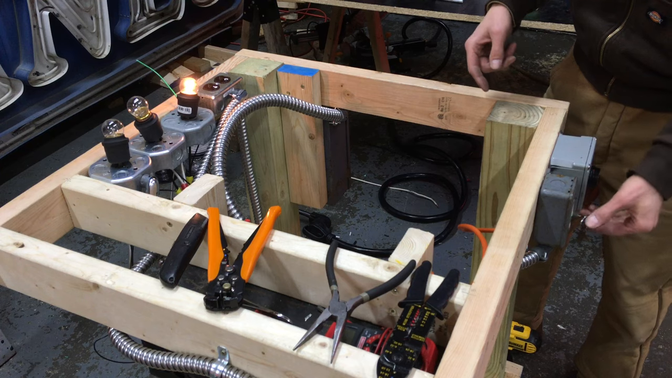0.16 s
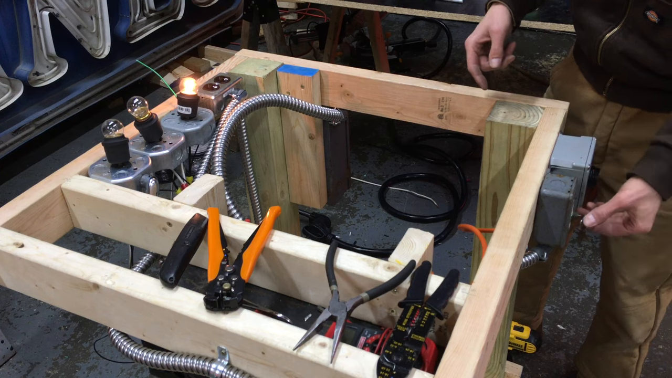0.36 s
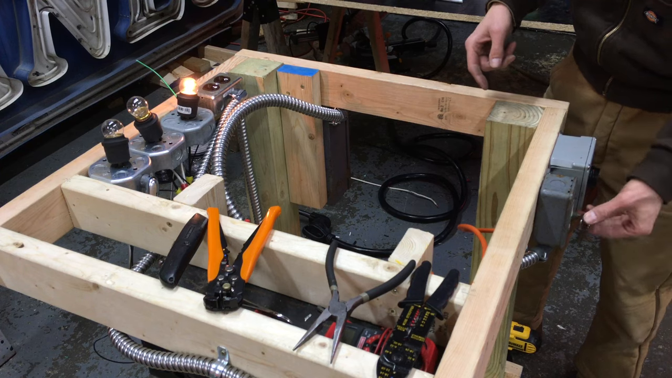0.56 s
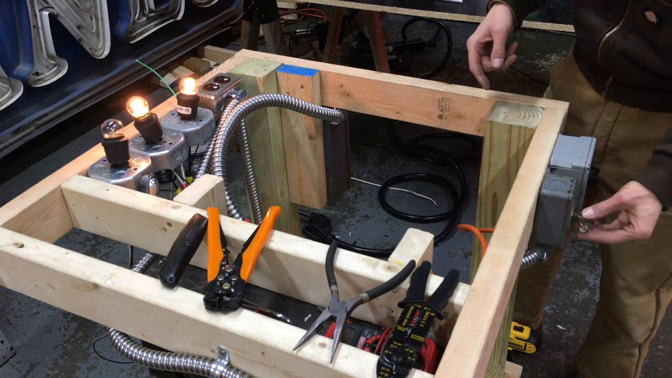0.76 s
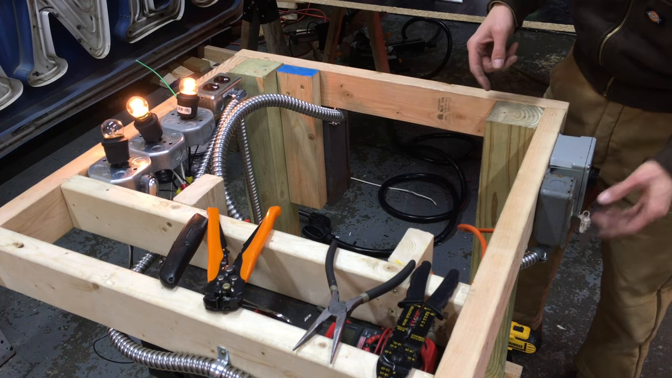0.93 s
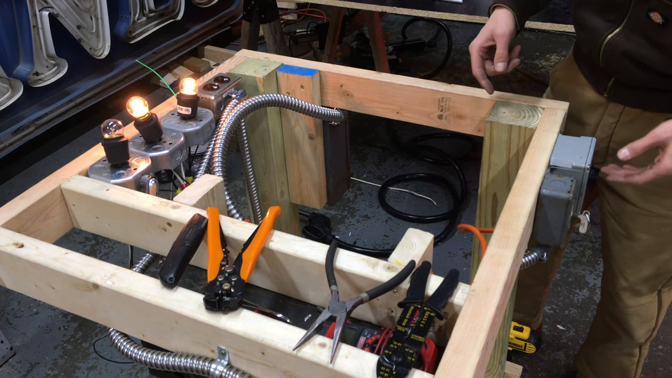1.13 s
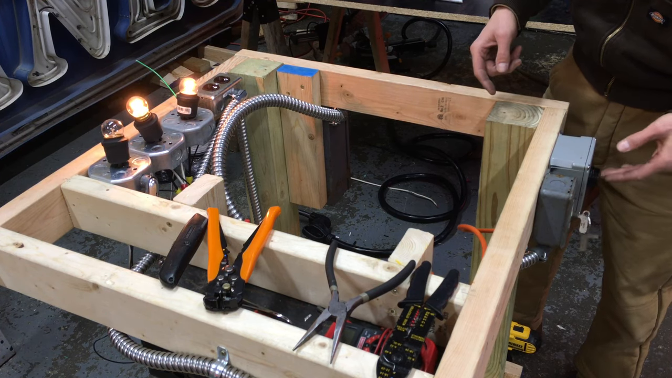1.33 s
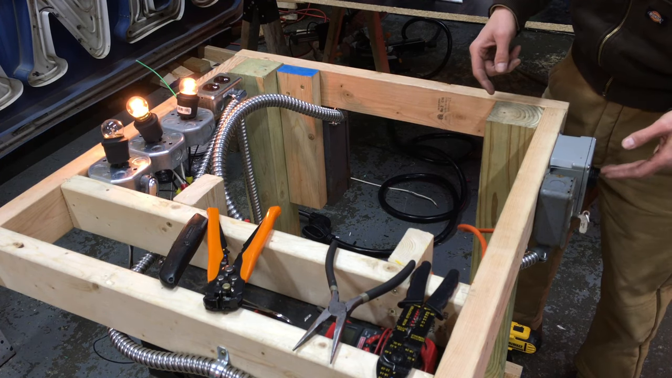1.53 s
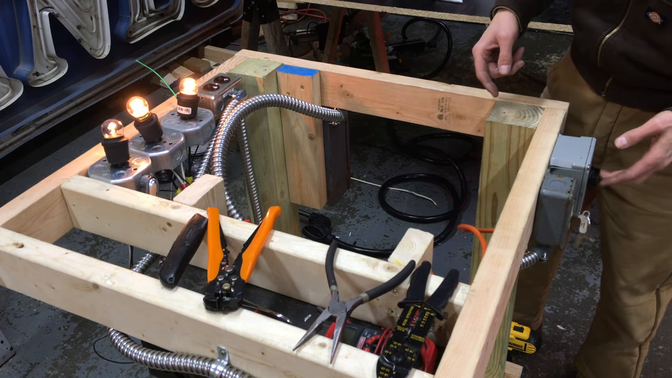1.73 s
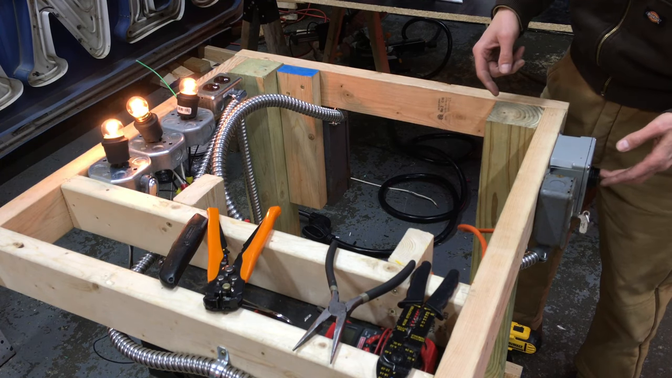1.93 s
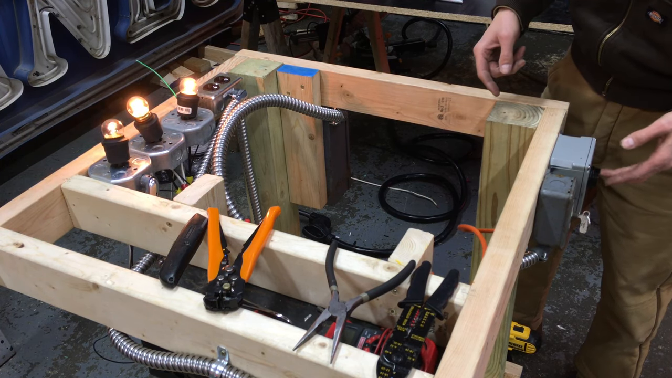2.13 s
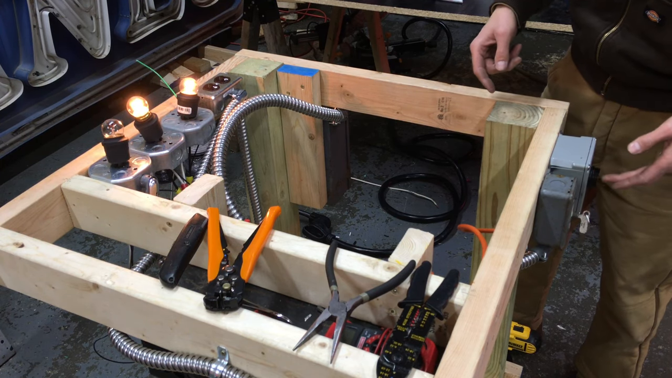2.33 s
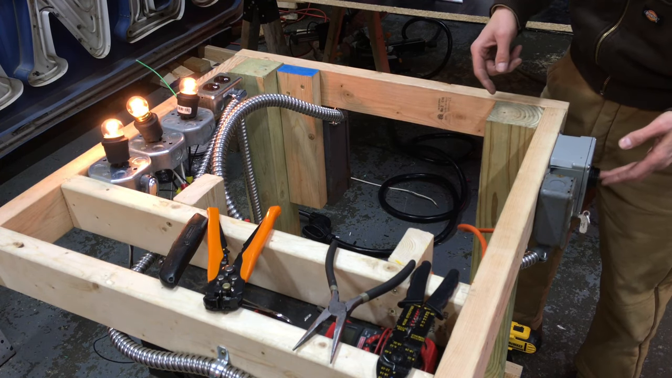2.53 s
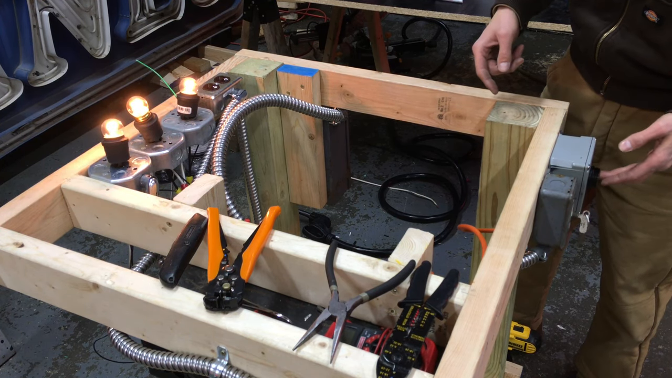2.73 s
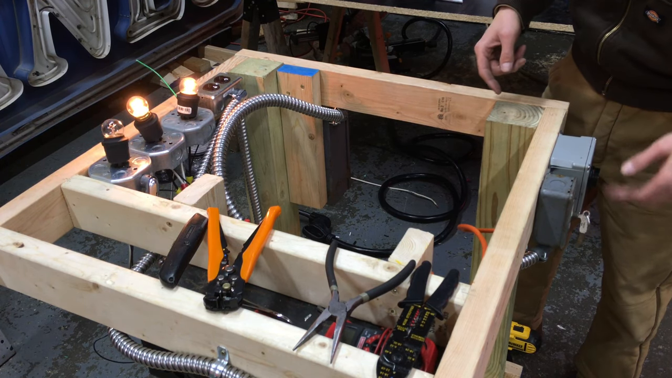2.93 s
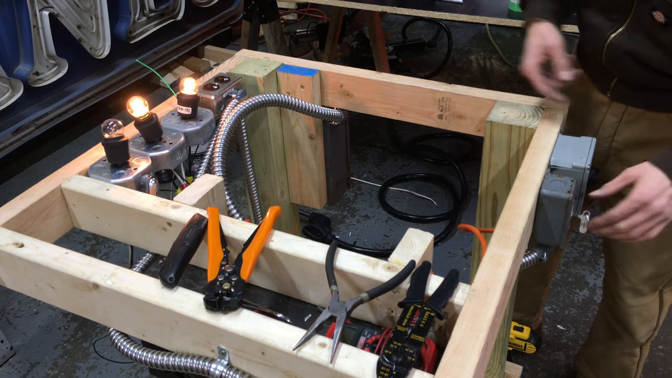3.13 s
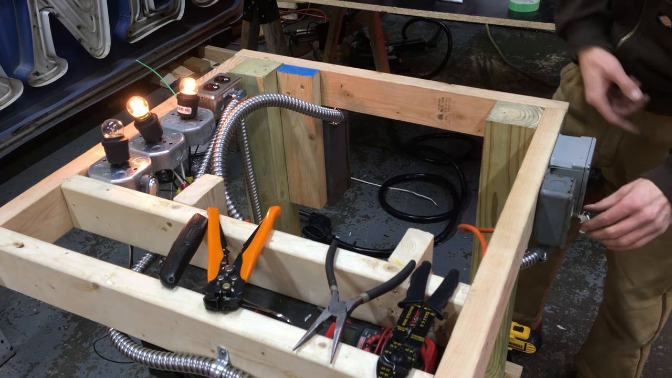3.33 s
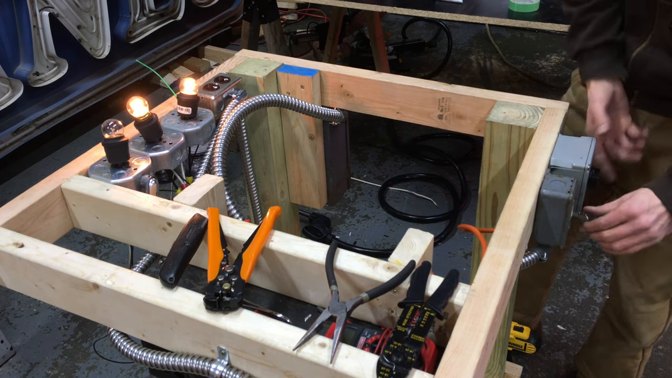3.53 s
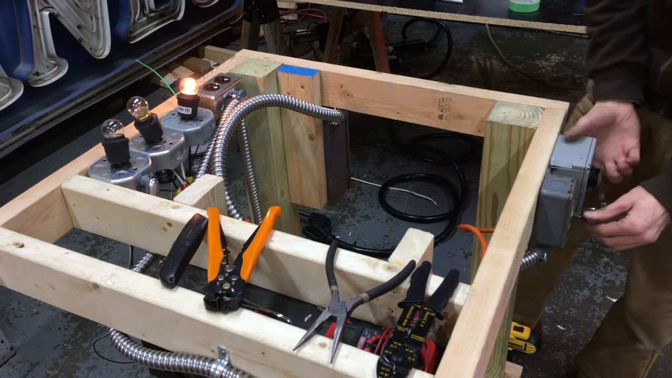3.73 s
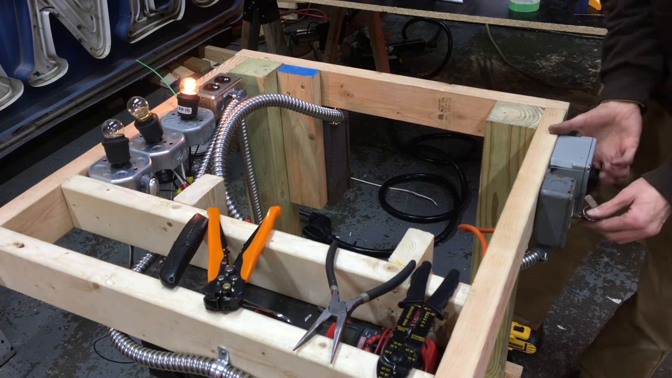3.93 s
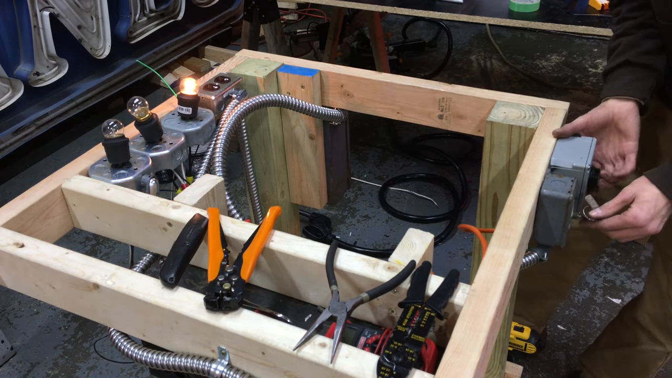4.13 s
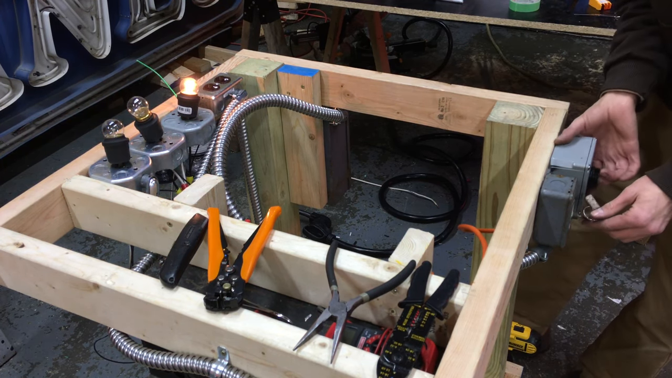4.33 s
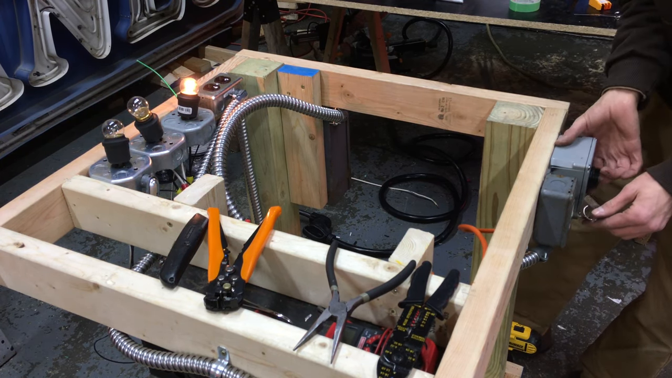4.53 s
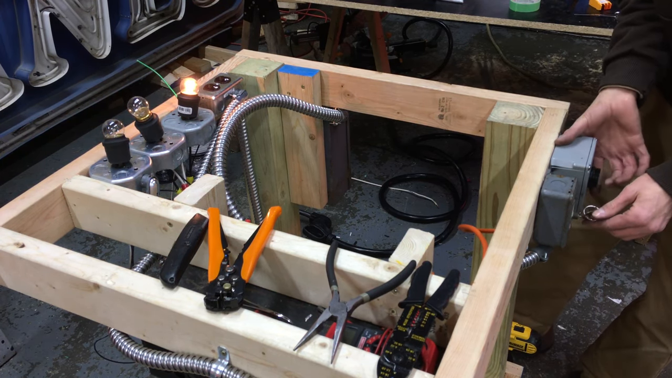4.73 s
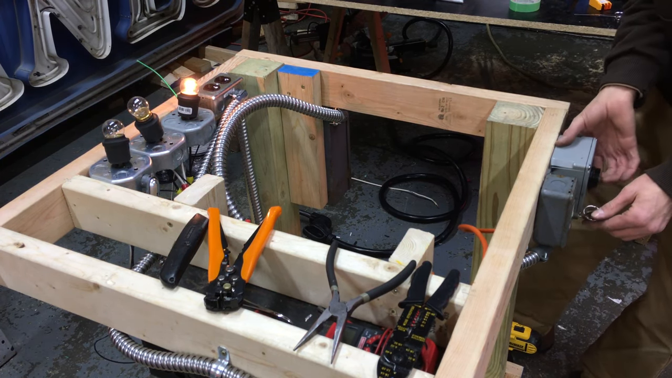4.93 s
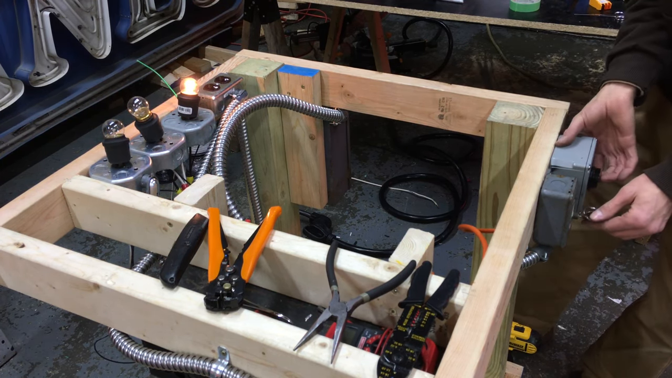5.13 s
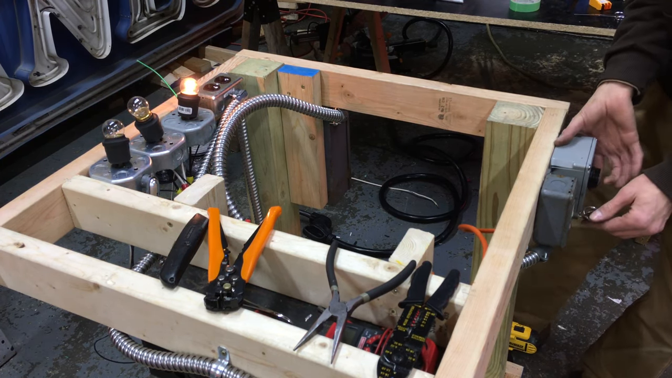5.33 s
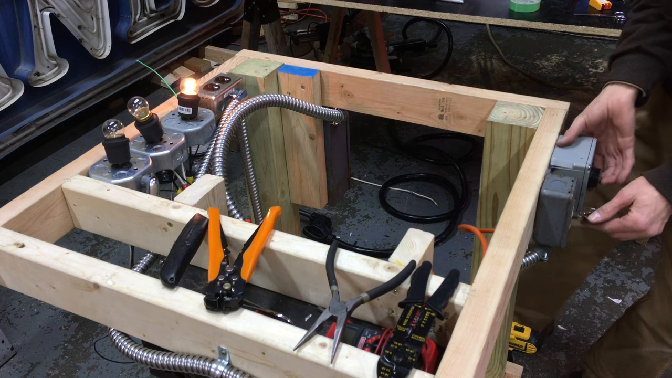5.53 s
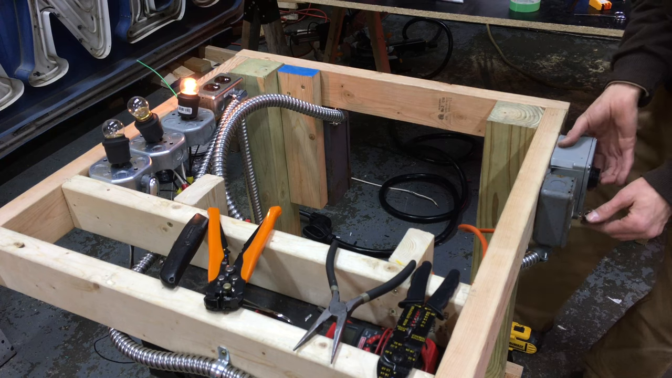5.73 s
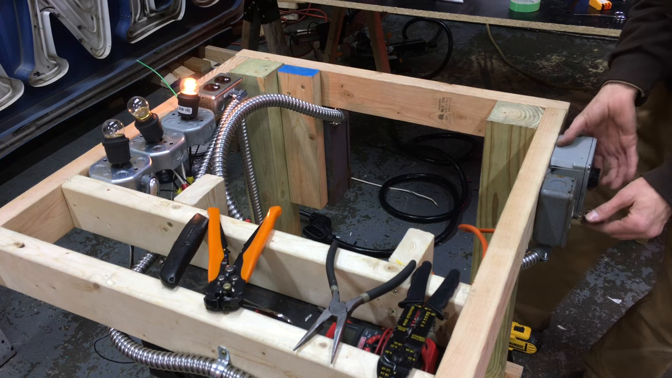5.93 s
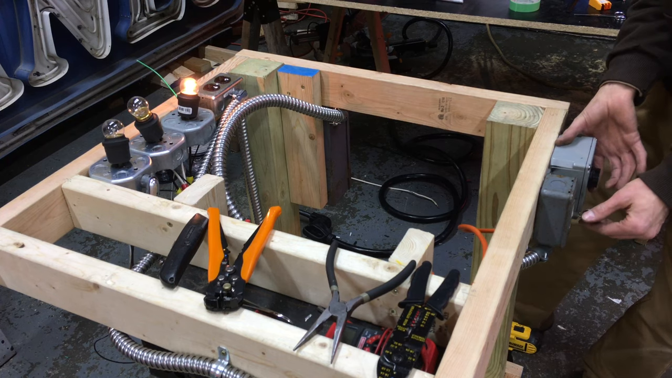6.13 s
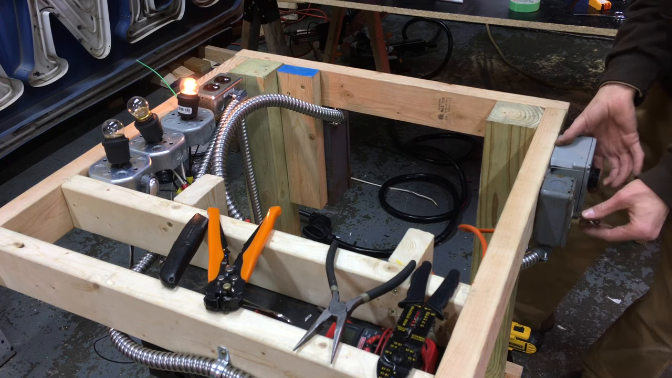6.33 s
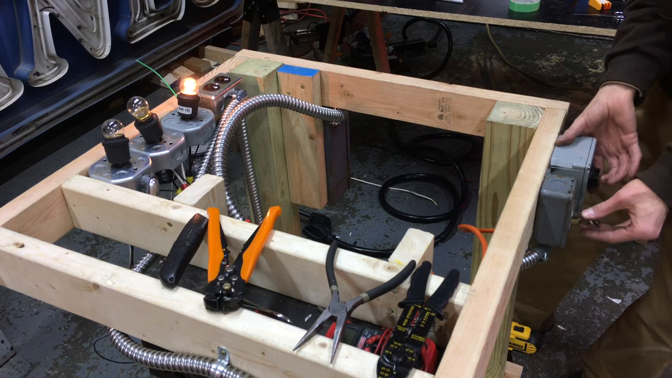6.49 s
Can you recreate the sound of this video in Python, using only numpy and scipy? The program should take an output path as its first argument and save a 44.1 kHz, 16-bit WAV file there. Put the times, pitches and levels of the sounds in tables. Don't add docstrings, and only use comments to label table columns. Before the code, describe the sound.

A key switch clicks with jingling keys, then a big contactor slams four times with overloaded metallic clangs, before small ticks in a ringing workshop.

```python
import sys
import numpy as np
from scipy import signal
from scipy.fft import rfft, irfft
from scipy.io import wavfile
from scipy.ndimage import uniform_filter1d

SR = 44100
rng = np.random.default_rng(int(sys.argv[2]) if len(sys.argv) > 2 else 0)


def decibels_to_gain(level_db):
    exponent = np.asarray(level_db, float) / 20
    return 10 ** exponent


def transcribe(signal):
    frames = np.atleast_2d(signal).T
    limited = np.clip(frames, -1, 1)
    pcm = np.round(limited * 32767).astype(np.int16)
    wavfile.write(sys.argv[1], SR, pcm)


N = 289296
LEAD = SR // 4

# (frequency [Hz], spectral density [dB per Hz])
AIR_SPECTRUM = [(35, -32), (60, -4.5), (119, -9.5), (257, -10), (442, -20.5), (795, -20.5), (1430, -28),
                (1540, -26.5), (1900, -32.5), (2760, -34.5), (4850, -42), (6290, -39), (10300, -41.5),
                (15000, -31.5), (16500, -40.5)]
# (time [s], level [dB])
SURGES = [(.06, -47), (.45, -49), (.78, -84), (1.15, -49.5), (1.499, -44), (1.752, -46), (2.189, -43),
          (2.749, -46.5), (3.482, -50.5), (3.781, -54), (4.159, -45.5), (4.6, -54), (4.9, -53.5),
          (5.359, -52), (5.65, -57), (6.1, -53), (6.45, -48.5)]
RUMBLE_HZ, RUMBLE_WIDTH_HZ = 45.8, 4.3

# (frequency [Hz], decay time t60 [s])
ROOM_T60 = [(100, 0.88), (400, 1), (1200, 1.0), (2800, 1), (6000, 0.77), (10000, 0.43), (16000, .35)]
# (delay [s], level [dB])
ECHOES = [(.0055, -19.5), (0.011, -12), (0.024, -13.5), (0.034, -16.5)]

# (frequency [Hz], level [dB], decay time t60 [s])
FRAME_MODES = [(137, -6.5, 0.27), (239, -4.5, 0.14), (390, 7.5, 0.15), (674, 1, 0.42), (955, -1, .1),
               (289.7, 2.5, 0.2), (463, -4.5, 0.17)]
# (time [s], frequency [Hz], level [dB], rise time [s])
THUMPS = [(.17, 78.7, -45.5, 0.037), (.70, 137, -40.5, 0.039), (.70, 390, -41, 0.031),
          (.89, 622, -46.5, 0.075), (1.76, 137, -43, 0.041), (2.2, 137, -38, 0.037),
          (2.93, 134.3, -40, 0.036), (3.62, 610, -42, 0.064), (3.619, 328, -40.5, 0.019),
          (3.625, 480, -42.5, 0.04), (3.63, 415, -42, 0.041), (4.36, 225, -42, 0.027),
          (4.40, 137, -41, 0.03)]

# (time [s], high ring [dB], middle ring [dB], share of free ring time [0-1])
SMALL_KEYS = [(0.694, -30, -53, 0.56), (0.782, -28, -33, 0.42), (0.868, -36, -48, .3),
              (.889, -42.5, -26.5, 0.15), (0.947, -33, -30, 0.32), (1.046, -47, -58, 0.49),
              (1.186, -41, -43.5, 0.96), (3.186, -20, -31, 0.43), (3.611, -13, -26, 0.54),
              (3.643, -24, -44, 0.63), (3.658, -40, -26, .3), (3.73, -33, -49, 0.87),
              (3.794, -20, -36, 0.38), (3.804, -22, -43, .35), (3.917, -31.5, -38.5, 0.16),
              (4.711, -30, -55, 0.53), (4.735, -57, -44, 0.24)]
# (time [s], level [dB], share of free ring time [0-1])
LONG_KEY = [
    (0.947, -46, 0.34),
    (1.184, -46, 1),
    (3.186, -60, 0.97),
    (3.643, -51, .63),
    (4.711, -57, 0.42),
]
# (frequency [Hz], split [Hz], decay time t60 [s], share of the weaker mode [0-1])
KEY_MODES = [
    (15570, 30, .25, .7),
    (7185, 5, 1.4, .95),
    (12410, 27, .4, .7),
]
BEAT_TURNS = (0.085, 0.08, 0.051)

# (frequency [Hz], spectral density [dB per Hz])
TICK_SPECTRUM = [(290, -40), (600, -7.5), (1100, -8.5), (2160, -12), (3350, -6), (7700, -8.5),
                 (14900, -6.5), (16500, -18.5)]
# (time [s], tick level [dB], ring level [dB])
LOCK = [(0.6784, -21.5, -38.5), (0.6822, -22, -45), (0.6928, -7.5, -51), (1.1872, -19.5, -35.5),
        (3.185, -22, -40)]
BARREL = [(3.5756, -36, -55), (3.6131, -2.5, -27), (3.6176, -15, -43), (3.7049, -18, -45),
          (3.7658, -32, -63), (3.7963, -21.5, -59.5), (3.9144, -22.5, -52)]
COVER = [(-.03, -26.5, -30), (0.2994, -48, -68), (3.4444, -40, -56), (4.0729, -34, -44), (4.658, -45, -37),
         (4.8614, -40.5, -45.5), (5.291, -40, -39), (5.4313, -55, -45), (5.4548, -46, -50),
         (5.9163, -20.5, -30.5), (6.1594, -47, -56)]
BOX = [(0.57, -50, -70), (4.3765, -38.5, -48), (4.5515, -51, -62), (4.6552, -23, -34.5), (4.9417, -48, -46),
       (5.0944, -53, -64), (5.7483, -54, -53), (5.8833, -41.5, -49)]
ROCKER = [(4.2475, -45, -50.5), (5.2871, -24.5, -36), (5.5024, -40.5, -47)]
SPRING = [(.697, -35, -35), (1.6634, -41, -50), (4.66, -51, -40), (4.862, -52, -52), (5.29, -44, -35.5),
          (5.5175, -40, -46.5), (6.3594, -38.5, -65)]
PIN = [(3.6006, -31, -49), (3.603, -28, -43), (3.6431, -22, -47), (4.66, -48, -37)]
LEVER = [
    (4.6242, -29, -42),
    (4.712, -40, -42),
    (5.2347, -31, -42),
    (5.875, -48, -50),
    (5.9047, -37, -46),
]
PANEL = [(4.945, -51, -47), (5.288, -50, -43), (5.918, -45, -43)]
CATCH = [
    (.697, -43, -33),
    (4.693, -41, -52),
    (4.7094, -25, -38),
    (5.5175, -33, -44),
]
TUMBLERS = [(.8718, -49.5, -48.5), (.8892, -22.5, -43.5), (.9457, -28, -52.5), (1.1209, -33, -46.5),
            (1.27, -50.5, -52)]
SLIDE = [(.7815, -26, -46), (.895, -38, -43.5), (.975, -33.5, -44.5), (1.0448, -31, -40.5),
         (1.125, -45, -51), (1.452, -38.5, -49.5)]
# (clicks, centre frequency [Hz], mode spread [0-1], decay time t60 [s],
# tick tilt [dB per octave], contact time [s])
PARTS = [(LOCK, 2540, .04, 0.061, 1.2, 0.0018), (BARREL, 3590, 0.026, 0.031, 1.9, 0.00097),
         (COVER, 2830, 0.061, 0.011, -0.72, 0.0018), (BOX, 1710, 0.12, 0.019, -0.96, 0.0014),
         (ROCKER, 1785, 0.076, 0.022, -0.19, 0.0011), (SPRING, 5650, 0.08, .015, -1.5, 0.0023),
         (PIN, 8700, .05, 0.025, 1.2, 0.0019), (LEVER, 3700, 0.11, 0.0027, -2.1, 0.0017),
         (PANEL, 985, 0.027, 0.14, -1.6, 0.003), (CATCH, 6230, .008, .05, -1.4, 0.0012),
         (TUMBLERS, 2560, 0.03, .03, 1.5, .011), (SLIDE, 3450, .13, .015, 1.5, .011)]
# (time [s], level [dB])
TOUCHES = [(4.2471, -47.5), (4.3762, -40), (4.6249, -40.5), (4.7099, -39), (5.4304, -37)]

# (time [s], level [dB], rattle time [s])
PULLS = [
    (1.746, 5.007, 0.0077),
    (2.454, 5, 0.0092),
]
DROPS = [
    (2.153, 2.994, 0.0066),
    (2.892, 5, 0.0029),
]
# (lead [s], level re the blow [dB], rattle time [s])
PULL_START = (0.022, -36.5, 0.059)
DROP_START = (0.011, -22.5, 0.0087)
# (frequency [Hz], width [Hz], peak level [dB])
PULL_BODY = [(850, 150, -12), (1249.6, 61, 3), (1434, 92, -8.5), (1619, 15, -12.5), (1855, 140, -7),
             (2245, 270, -16.5), (2724, 63, -17.5), (3500, 55, -11.5), (5540, 270, -21.5),
             (6443, 400, -12.5)]
DROP_BODY = [(840, 130, -13), (1320, 59, -2), (1762, 59, -3), (2460, 220, -9), (4260, 430, -5.5),
             (5860, 900, 6.5), (6670, 240, 3.5), (9000, 500, 4), (11080, 1860, -4)]
# (frequency [Hz], spectral density [dB per Hz])
PULL_CRACK = [(59, -56.5), (100, -36.5), (273, -13.5), (427, -28), (794, -22.5), (1030, -19.5),
              (1270, -9.5), (1470, -10), (2510, -11.5), (2980, -19.5), (13300, -20), (15400, -23.5),
              (16500, -42.5)]
DROP_CRACK = [(59, -37.5), (100, -13), (291, -7.5), (560, -11.5), (1000, -10), (1270, -6), (1470, -11.5),
              (1750, -5.5), (3390, -8), (5910, -7.5), (13600, -16.5), (15400, -20), (16500, -32)]
# (frequency [Hz], level [dB], decay time t60 [s])
YOKE_MODES = [(1269, 2.5, 0.96), (1224, -10, 0.52), (1810, -11, 0.46), (2545, -15, 0.69), (783, -15, 0.8),
              (1358, -10.5, .6), (1600, -14.5, .6), (3370, -19.5, .5)]


def peak(x, db):
    return x * decibels_to_gain(db) / np.max(np.abs(x))


def level(x, db):
    return x * decibels_to_gain(db) / np.sqrt(np.mean(x ** 2))


def shade(x, table):
    hz, db = np.transpose(table)
    f = np.arange(1025) * SR / 2048 + 1
    gain = decibels_to_gain(np.interp(np.log(f), np.log(hz), db))
    cepstrum = irfft(np.log(gain))
    cepstrum[1:1024] *= 2
    cepstrum[1025:] = 0
    response = irfft(np.exp(rfft(cepstrum)))
    return signal.fftconvolve(x, response)[:len(x)]


def ring(x, hz, t60):
    radius = np.exp(-np.log(1000) / (max(t60, 1 / 1000) * SR))
    angle = 2 * np.pi * hz / SR
    return signal.lfilter([np.sin(angle)], [1, -2 * radius * np.cos(angle), radius * radius], x)


def rattle(tau, rough_db, size=SR // 3):
    grains = np.repeat(decibels_to_gain(rough_db * rng.standard_normal(size // 20 + 1)), 20)[:size]
    decay = np.exp(-np.arange(size) / (max(tau, 1 / SR) * SR))
    spectrum = rfft(rng.standard_normal(size) * grains * decay)
    smooth_power = uniform_filter1d(np.abs(spectrum) ** 2, size // 200)
    force = irfft(spectrum / np.sqrt(smooth_power), size)
    return force * (np.arange(size) < size // 2)


def add(out, x, s):
    i = int(s * SR) + LEAD
    out[i:i + len(x)] += x[:len(out) - i]


def walk(rate):
    k = int(SR / rate)
    steps = np.repeat(rng.standard_normal(N // k + 1), k)
    return 1.2 * uniform_filter1d(uniform_filter1d(steps, k), k)[:N]


def ventilation():
    hiss = shade(rng.standard_normal(N + LEAD), AIR_SPECTRUM)[LEAD:]
    air, spectrum = 0, rfft(hiss)
    f = np.arange(N // 2 + 1) * SR / N + 1
    for centre in 50 * 2. ** np.arange(9):
        band = irfft(spectrum * np.maximum(1 - np.abs(np.log2(f / centre)), 0), N)
        steadiness = min(1., (400 / centre) ** 0.79)
        air = air + band * decibels_to_gain((2.0 * walk(1.0) + walk(6.1)) * steadiness)

    t = np.arange(N) / SR
    hum_db, surge_s = -60, .12
    swell = decibels_to_gain(hum_db) + sum(decibels_to_gain(db) * np.exp(-((t - s) / surge_s) ** 2) for s, db in SURGES)
    pitch_hz = RUMBLE_HZ + .3 * RUMBLE_WIDTH_HZ * walk(8)
    rumble = np.sin(2 * np.pi * np.cumsum(pitch_hz) / SR)
    rumble = rumble + .5 * level(ring(rng.standard_normal(N), RUMBLE_HZ, 3.6 / RUMBLE_WIDTH_HZ), 0)
    return level(air, -51) + level(rumble, 0) * swell


def room():
    near_t60_s, near_db, room_db = 0.031, -3.5, -4.5
    t = np.arange(SR) / SR
    hz, t60 = np.transpose(ROOM_T60)
    f = np.arange(SR // 2 + 1) + 1.
    noise, tail = rfft(rng.standard_normal(SR)), 0
    for centre in 60 * 2 ** np.arange(0, 8.6, .5):
        band = irfft(noise * np.maximum(1 - 2 * np.abs(np.log2(f / centre)), 0), SR)
        tail = tail + band * decibels_to_gain(-60 * t / np.interp(np.log(centre), np.log(hz), t60))
    tail *= 1 - np.exp(-t / 0.0052)
    near = rng.standard_normal(SR) * decibels_to_gain(-60 * t / near_t60_s) * (1 - np.exp(-t / 0.0036))
    response = decibels_to_gain(room_db) * tail / np.linalg.norm(tail) + decibels_to_gain(near_db) * near / np.linalg.norm(near)
    for s, db in ECHOES:
        response[int(s * SR)] += decibels_to_gain(db)
    return response


def thumps():
    out, t = np.zeros(N + LEAD), np.arange(SR // 2) / SR
    for s, hz, db, rise in THUMPS:
        wobble = 0.4 * np.sin(2 * np.pi * (11 * t + rng.random()))
        rough = np.clip((hz - 150) / 350, 0, 1)
        crowd = level(ring(rng.standard_normal(len(t)), hz, 14 / hz), -3)
        tone = (1 - rough) * np.sin(2 * np.pi * hz * t + wobble) + rough * crowd
        envelope = t / rise * np.exp(1 - t / rise)
        add(out, decibels_to_gain(db) * envelope * tone, s)
    return out


def timber(force):
    push = uniform_filter1d(np.abs(force), 12)
    sway = decibels_to_gain(4.0 * rng.standard_normal(len(FRAME_MODES)))
    return sum(decibels_to_gain(db) * share * ring(push, hz, t60) * 1000 / hz
               for (hz, db, t60), share in zip(FRAME_MODES, sway))


def keys():
    out, t = np.zeros(N + LEAD), np.arange(SR // 2) / SR
    high = [(s, db, hold) for s, db, _, hold in SMALL_KEYS]
    middle = [(s, db, hold) for s, _, db, hold in SMALL_KEYS]
    for rows, (hz, split_hz, t60, depth), turns in zip((high, LONG_KEY, middle), KEY_MODES, BEAT_TURNS):
        beat = 1 + depth * np.exp(2j * np.pi * (split_hz * t + turns))
        tone = np.imag(beat * np.exp(2j * np.pi * hz * t))
        for s, db, hold in rows:
            decay = decibels_to_gain(db - 60 * t / (t60 * max(hold, .05)))
            fades = (1 - t / t[-1]) * np.minimum(t / .0015, 1)
            add(out, decay * tone * fades, s)
    return out


def clicks():
    knock_db, knock_share = -29, .55
    ticks, parts = np.zeros((2, N + LEAD))
    for rows, hz, spread, t60, tilt_db, contact in PARTS:
        colour = [(f, db + tilt_db * np.log2(max(f, 1500) / 4000)) for f, db in TICK_SPECTRUM]
        for s, tick_db, ring_db in rows:
            force = rattle(contact, rough_db=3.5)
            cluster_hz = hz * (1 + spread * (2 * rng.random(6) - 1))
            part = sum(ring(force, f, t60) for f in cluster_hz)
            knock = peak(timber(force), knock_db + knock_share * tick_db)
            add(ticks, peak(shade(force, colour), tick_db), s)
            add(parts, peak(part, ring_db + 5) + knock, s)
    for s, db in TOUCHES:
        add(parts, peak(timber(rattle(0.0031, rough_db=6.0)), db), s)
    return ticks, parts


def contactor(blows, start, body, crack, crack_db, yoke_db, timber_db):
    out = np.zeros(N + LEAD)
    for s, db, tau in blows:
        for lead, under_db, length in ((0, 0, tau), start):
            force = rattle(length, rough_db=1.5, size=SR // 2)
            ring_db = -8.5 if lead else 0
            modes = 0
            for k, (hz, width, mode_db) in enumerate(body):
                mode = level(ring(force, hz, 2.5 / width), mode_db + 10 * np.log10(width))
                modes = modes + (-1) ** k * mode
            yoke = sum(decibels_to_gain(g) * level(ring(force, hz, t60), 0) for hz, g, t60 in YOKE_MODES)
            knock = timber(force * np.exp(-np.arange(SR // 2) / 60))
            sound = level(modes, ring_db) + level(shade(force, crack), crack_db)
            sound += level(yoke, yoke_db + ring_db) + level(knock, timber_db)
            add(out, peak(sound, db + under_db), s - lead)
    return out


def scene():
    pulls = contactor(PULLS, PULL_START, PULL_BODY, PULL_CRACK, crack_db=0, yoke_db=-8.5, timber_db=-21.5)
    drops = contactor(DROPS, DROP_START, DROP_BODY, DROP_CRACK, crack_db=1, yoke_db=-23, timber_db=-22)
    slams = decibels_to_gain(3.5) * pulls + decibels_to_gain(1.0) * drops
    small_source = signal.butter(2, 150, "high", fs=SR, output="sos")
    slams = signal.sosfilt(small_source, signal.sosfilt(small_source, slams))
    jingle = keys()
    ticks, parts = clicks()

    sent = slams + decibels_to_gain(0.5) * ticks + decibels_to_gain(-0.5) * parts + decibels_to_gain(-6.5) * jingle
    reverberant = signal.fftconvolve(sent, room())[:LEAD + N]
    heard = slams + ticks + parts + jingle + thumps() + reverberant
    return (heard[LEAD:] + ventilation())[None]


def top_cut(x):
    return signal.sosfilt(signal.butter(12, 16620, fs=SR, output="sos"), x)


def record(dry):
    loud = np.clip(np.tanh(dry / 2.423) * 2.49, -.97, .97)
    loud = signal.sosfilt(signal.butter(2, 30, "high", fs=SR, output="sos"), loud)
    loud = signal.sosfilt(signal.ellip(10, .2, 45, 15900, fs=SR, output="sos"), loud)
    return top_cut(loud)


dry = scene()
out = record(dry)
transcribe(out)
```